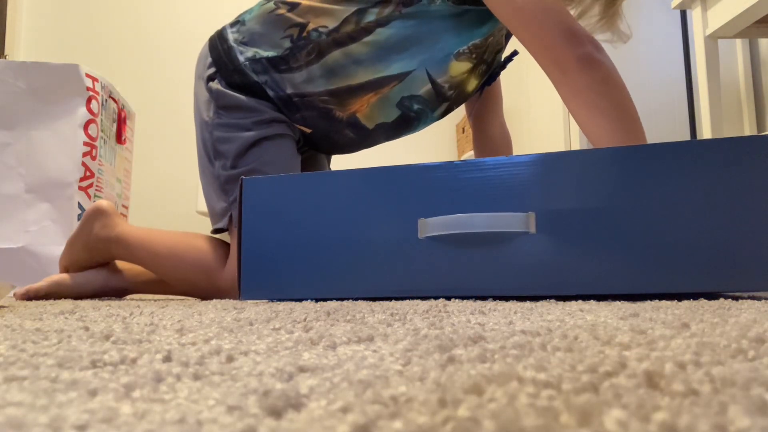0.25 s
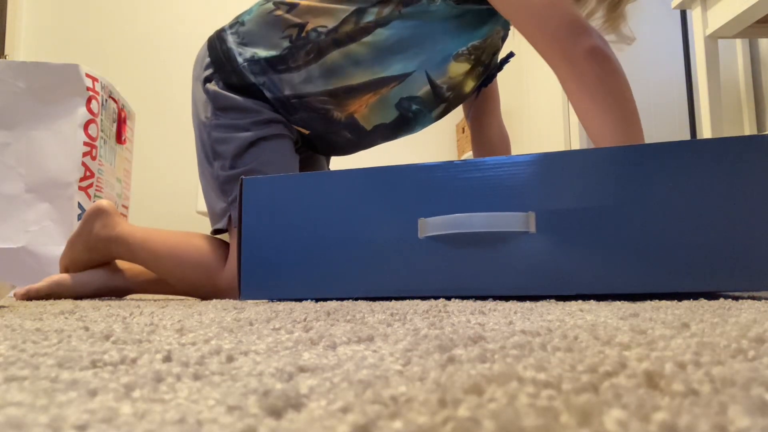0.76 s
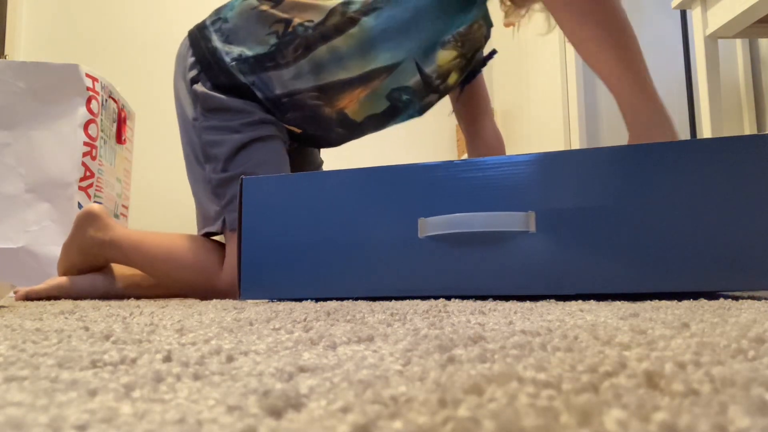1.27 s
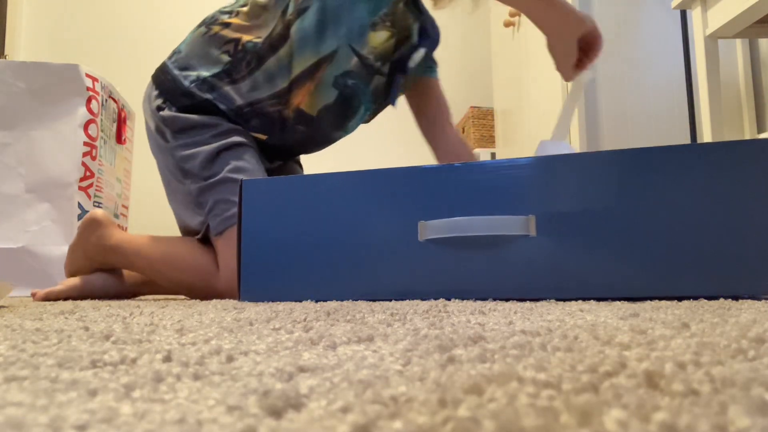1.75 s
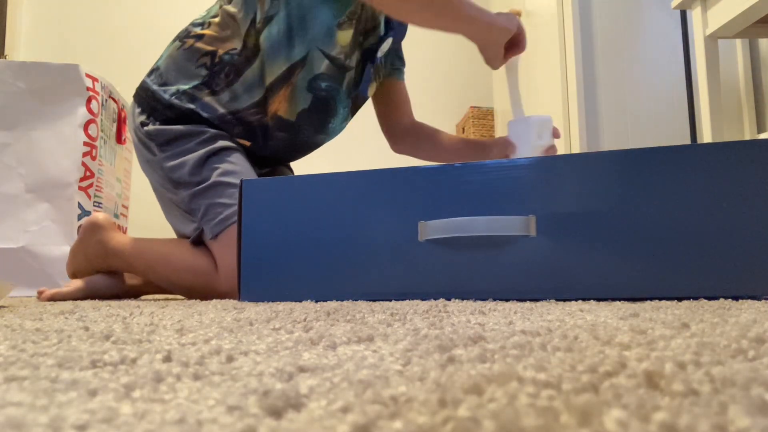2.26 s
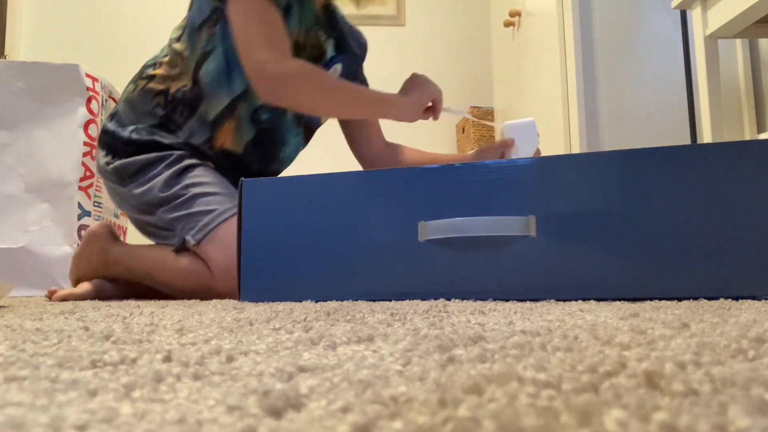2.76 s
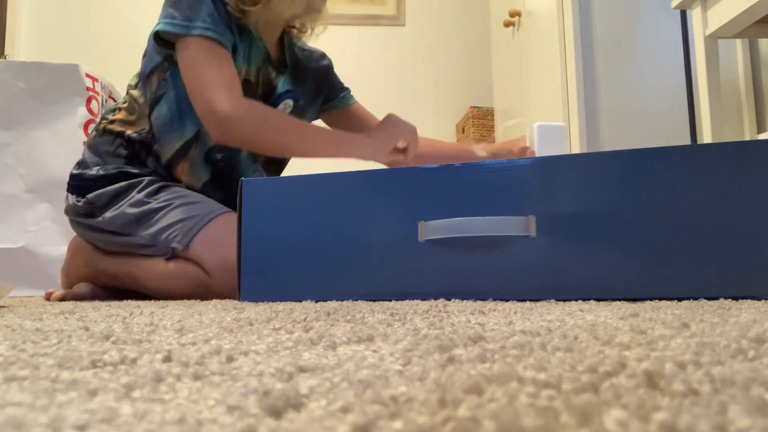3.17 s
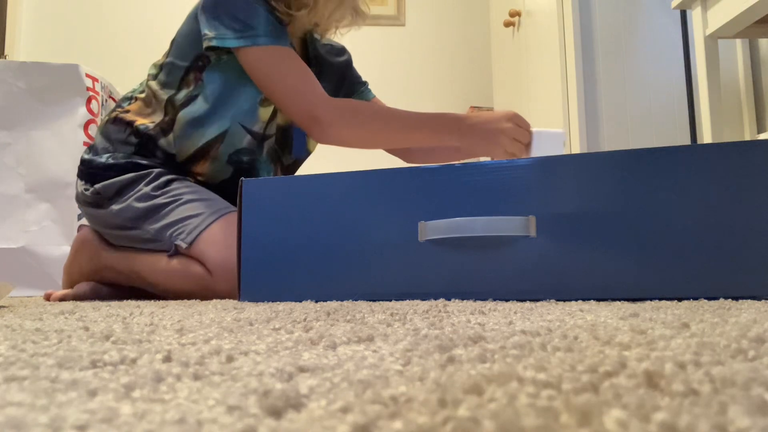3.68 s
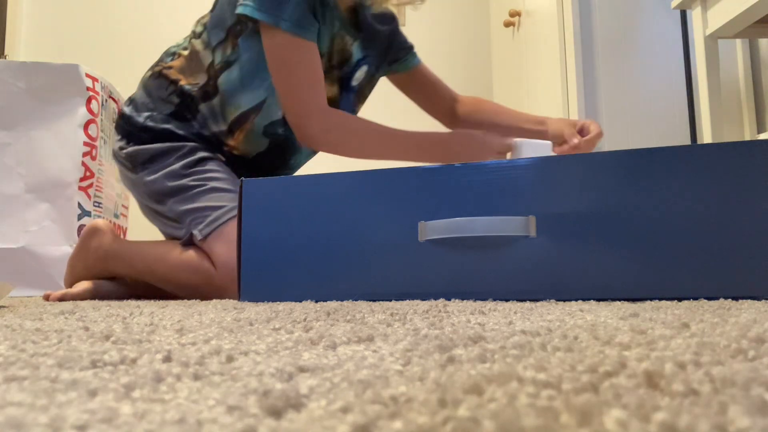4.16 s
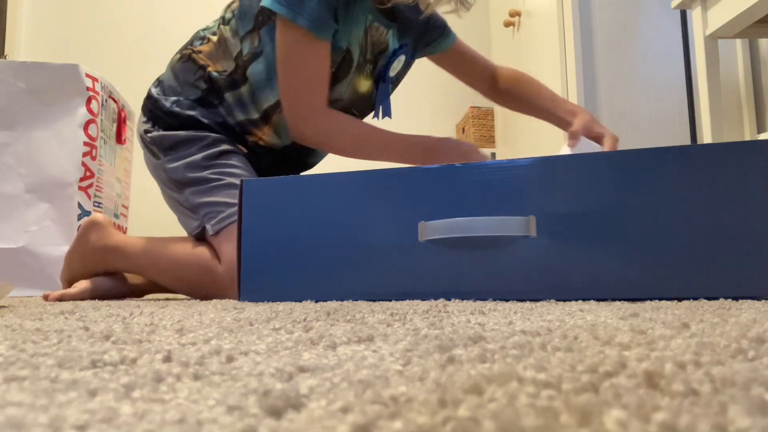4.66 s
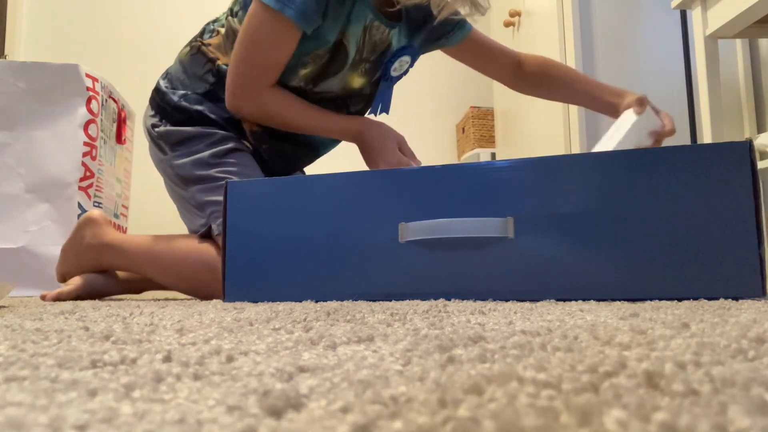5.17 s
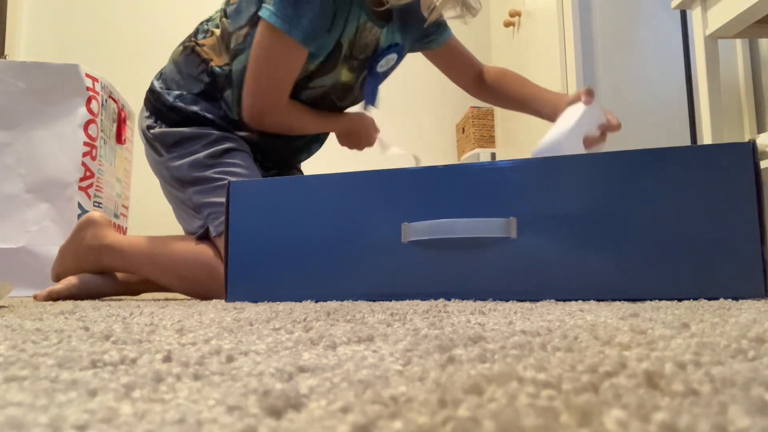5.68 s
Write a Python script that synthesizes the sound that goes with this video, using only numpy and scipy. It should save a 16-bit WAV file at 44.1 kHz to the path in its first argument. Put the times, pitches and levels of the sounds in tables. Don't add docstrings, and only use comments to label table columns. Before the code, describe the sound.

Sticky tape is ripped off a cardboard box in short scratchy pulls, with snaps, hollow board knocks and a loud final crack.

```python
import sys
import numpy as np
from scipy import signal
from scipy.fft import rfft, irfft, next_fast_len
from scipy.io import wavfile
from scipy.ndimage import uniform_filter1d

SR = 44100
rng = np.random.default_rng(int(sys.argv[2]) if len(sys.argv) > 2 else 0)


def rack_gain(trim_db):
    fader = np.asarray(trim_db, float)
    return 10 ** (fader / 20)


def wav_out(sig):
    wavfile.write(sys.argv[1], SR, np.round(np.clip(np.atleast_2d(sig).T, -1, 1) * 32767).astype(np.int16))


N = 261513
PADDED = next_fast_len(N)
BINS_HZ = np.fft.rfftfreq(PADDED, 1 / SR) + 1

# frequency in Hz, level in dB per Hz.
RIP_COLOUR = [(1200, 11.5), (1700, -2.5), (2300, 3.5), (3500, -1), (5000, -0.5), (6000, -5), (8500, 2),
              (11000, -0.5), (13500, -1), (15000, -0.5), (15800, 11.5), (16000, -61.5)]
# frequency in Hz, level in dB, 60 dB decay in s.
PANEL_MODES = [(112, -7.5, 0.089), (240, -18.5, 0.67), (258, 6, 0.069), (326.3, 0, 0.13),
               (373, -13.5, 0.41), (431, 1, 0.065), (498.6, 2, 0.076), (573, 4, 0.096),
               (693.8, -4.5, 0.086), (805.5, 3.5, 0.038), (947, 1, 0.041), (1040, -7.5, 0.075),
               (1163, -4.5, 0.073), (1244, 1.5, 0.025), (1524, -5, 0.036), (1721, -9, 0.08),
               (1880, 0.5, 0.0017)]
# start in s, peak in dB, centre of the ring in Hz, upper modes in dB.
THUMPS = [(.966, -29.5, 346, -4), (1.196, -34, 450, 25), (1.349, -47, 447, -25), (1.394, -40, 428, -49),
          (1.442, -33, 447, -4), (1.464, -49, 127, 1), (1.655, -29, 360, -1), (1.814, -37.5, 230, -19),
          (2, -31.5, 530, -11.5), (2.033, -26.5, 463, -4), (2.214, -35.5, 128.3, -29),
          (2.235, -39, 328, -6), (2.864, -38.5, 240, -41.5), (2.901, -41, 240, -30.5),
          (3.266, -45, 510, -6.5), (3.676, -36.5, 390, 1), (4.117, -21.5, 362, -9), (4.762, -23.5, 266, -7),
          (4.876, -32.5, 258, -38), (4.914, -23, 278, -16), (5.504, -18.5, 428, -18),
          (5.602, -34, 278, -26.5), (5.611, -30, 240, -23), (5.616, -30.5, 117, -35),
          (5.666, -42.5, 500, 9.5)]
# start in s, peak in dB, centre of the ring in Hz, upper modes in dB.
TAPS = [(0.225, -44.5, 627, 3), (0.236, -42, 607, 4), (0.635, -35.5, 595, 14), (1.24, -30.5, 840, -34),
        (1.328, -27.5, 940, -35), (1.712, -35.5, 583, -5), (1.749, -35.5, 810, -17), (2.361, -21, 633, -13),
        (2.477, -33.5, 613, 0), (2.5186, -16.5, 680, 7), (2.805, -41, 835, -9), (3.061, -30, 557, 8),
        (3.159, -30, 1210, -38), (3.361, -51.5, 583, -15), (3.438, -57, 547, -12), (3.778, -34, 600, -4),
        (3.991, -43, 1070, -24), (4.09, -30, 1130, 7), (4.399, -38.5, 800, -1), (4.457, -42, 735, -7),
        (4.921, -20.5, 800, 4), (4.977, -20.5, 940, 8), (5.233, -47, 543, -11), (5.251, -37.5, 604, -8),
        (5.335, -36.5, 684, -8), (5.413, -41.5, 556, -17), (5.451, -38.5, 510, -19.5), (5.492, -10, 566, 2),
        (5.524, -22, 550, -27), (5.69, -44, 526, -5)]


def rms_one(x):
    return x / np.sqrt(np.mean(x ** 2) + 1e-20)


def at_hz(points, column=1):
    table = np.array(points)
    return np.interp(np.log(BINS_HZ), np.log(table[:, 0]), table[:, column])


def coloured(x, points, low_hz=0, high_hz=30000):
    band_power = 1 / (1 + (low_hz / BINS_HZ) ** 8) / (1 + (BINS_HZ / high_hz) ** 8)
    spectrum = rfft(x, PADDED) * rack_gain(at_hz(points)) * np.sqrt(band_power)
    return irfft(spectrum, PADDED)[:, :N]


def above(x, hz):
    return signal.sosfilt(signal.butter(4, hz, "high", fs=SR, output="sos"), x)


def drift(per_s):
    r = np.exp(-40 * np.pi * per_s / SR)
    noise = rng.standard_normal(N // 20 + 2002)
    slow = signal.lfilter([1], [1, -2 * r, r * r], noise)[2000:]
    return np.interp(np.arange(N) / 20, np.arange(len(slow)), rms_one(slow))


def grains(per_s, spread_db):
    sizes = rack_gain(spread_db * np.minimum(rng.exponential(1, N), 5))
    slips = sizes * (rng.random(N) < per_s / SR)
    return slips * rng.choice([-1, 1], (2, N))


def motion(releases, late_s=0):
    pause_s, jump_s = .024, .013
    t = np.arange(N) / SR
    for s, *_ in releases:
        i = round((s + late_s) * SR)
        t[max(i - round(pause_s * SR), 0):i] = s - pause_s
        t[i:i + round(jump_s * SR)] = s + jump_s
    return t


def effort(t, strokes, fade_db_per_s, rest_db, rest_colour):
    power = rack_gain(2 * rest_db) + 0 * t
    colour = power * rest_colour
    for s, db, swell_s, own_colour, hold_s in strokes:
        span_s = s + np.array([-3 * swell_s - .05, hold_s + .4])
        near = slice(*np.clip(np.round(span_s * SR), 0, N).astype(int))
        below_full_db = 20 * np.maximum(s - t[near], 0) / swell_s
        faded_db = fade_db_per_s * np.maximum(t[near] - s - hold_s, 0)
        part = rack_gain(2 * (db - below_full_db - faded_db))
        power[near] += part
        colour[near] += part * own_colour
    return 10 * np.log10(power), colour / power


def stillness():
    # frequency in Hz, level in dB per Hz.
    still_colour = [(30, -21.5), (60, 7), (150, -1.5), (500, -7), (1300, -21), (2500, -21), (6000, -24.5),
                    (9000, -30), (15700, -31), (16000, -53.5)]
    return rack_gain(-74.5) * rms_one(coloured(rng.standard_normal((2, N)), still_colour))


def rumble():
    # frequency in Hz, width in Hz, level in dB.
    floor_modes = [(48.6, 7.5, 8), (62.2, 2.7, -7.5), (83.6, 11, -4), (118.7, 18, -1.5)]
    # full load in s, level in dB, loudest floor mode in Hz, hold in s.
    loads = [(0.806, -66.5, 70, .04), (0.934, -51.5, 105, 0.25), (1.117, -52, 99, 0.1),
             (1.452, -47, 75, 0.0037), (1.695, -55, 87, .005), (1.803, -55.5, 100, 0.084),
             (2.04, -48.5, 70, 0.0028), (2.236, -53, 101, 0.0036), (2.445, -52, 67.5, 0.037),
             (2.562, -57, 80, 0.12), (2.912, -55.5, 100, 0.079), (3.063, -55, 67, 0.086),
             (3.702, -51.5, 92, 0.037), (4.143, -51.5, 88, 0.067), (4.66, -52, 90.5, .02),
             (4.763, -53, 118, 0.13), (4.917, -41, 108, 0.045), (5.075, -52.5, 80, 0.11),
             (5.204, -53, 65.4, 0.017), (5.45, -66.5, 112, .005), (5.5, -61, 105, 0.03),
             (5.637, -35.5, 95.4, 0.0023)]
    kneeling_db, kneeling_hz, swell_s = -69, 84.2, 0.17
    strokes = [(s, db, swell_s, hz, hold_s) for s, db, hz, hold_s in loads]
    level_db, centre_hz = effort(motion([]), strokes, 180, kneeling_db, kneeling_hz)
    centre_hz = 82 * (centre_hz / 82) ** 0.94
    out = 0
    for hz, width_hz, mode_db in floor_modes:
        r, w = np.exp(-np.pi * width_hz / SR), 2 * np.pi * hz / SR
        noise = rng.standard_normal((2, N))
        ringing = signal.lfilter([1, 0, -1], [1, -2 * r * np.cos(w), r * r], noise)
        distance_db = 16.4 * np.log2(hz / centre_hz) ** 2
        out = out + rack_gain(mode_db - distance_db) * rms_one(ringing)
    band = signal.butter(2, [38, 170], "band", fs=SR, output="sos")
    return rack_gain(level_db - 5.0) * signal.sosfilt(band, out)


def film(threads, edges_hz, patchy_db, lines_db):
    hz, _, frames = signal.stft(threads, SR, nperseg=512)
    chance = rng.standard_normal((2, *frames.shape[1:]))
    broad = uniform_filter1d(uniform_filter1d(chance[0], size=18, axis=0), size=6, axis=1)
    narrow = uniform_filter1d(uniform_filter1d(chance[1], size=2, axis=0), size=8, axis=1)
    rip_hz, rip_db = np.transpose(RIP_COLOUR)
    colour_db = np.interp(np.log(hz + 1), np.log(rip_hz), rip_db)[:, None]
    flicker_db = patchy_db * rms_one(broad) + lines_db * np.clip(rms_one(narrow), -3, 1.8)
    frames = frames * rack_gain(colour_db + flicker_db)
    below = [1 / (1 + (hz[:, None] / edge) ** 14) for edge in edges_hz]
    parts = []
    for low, high in zip(below, below[1:]):
        band = frames * np.sqrt(high - low)
        parts.append(signal.istft(band, SR, nperseg=512)[1][:, :N])
    return parts


def peel():
    # start in s, peak in dB, dying time in s.
    snaps = [(.006, -59, 0.14), (1.2516, -34, .06), (1.3957, -38, .08), (2.5985, -25.5, 0.043),
             (2.9417, -34, .03), (2.9637, -36, .03), (0.2244, -49, 0.15), (0.286, -74, 0.06),
             (0.6406, -21, 0.047), (0.767, -55, 0.06), (0.9694, -27, 0.37), (1.3284, -29, 0.27),
             (1.443, -23.5, 0.079), (1.6614, -23, 0.022), (1.9322, -21, 0.039), (1.9415, -26, 0.12),
             (2.202, -44, 0.06), (2.2154, -53, 0.049), (2.3611, -29, 0.069), (2.477, -25, 0.11),
             (2.5198, -14, 0.22), (3.0586, -25, 0.24), (3.16, -26, 0.13), (3.501, -58, 0.072),
             (3.7799, -23.5, 0.18), (3.9905, -23, 0.36), (2.717, -37, .02), (2.863, -51, 0.03),
             (2.897, -50.5, 0.037), (4.032, -40.5, 0.089), (4.3847, -32.5, 0.31), (4.4023, -31, 0.089),
             (4.4575, -24.5, 0.056), (4.9192, -14, 0.078), (5.4134, -58, 0.055), (5.448, -35.5, 0.06),
             (5.492, -10, 0.2), (5.4994, -23, 0.045), (5.7255, -30.5, 0.032)]
    # time in s, creep in dB.
    tension = [(0, -87), (.18, -88), (.44, -87), (.55, -66), (.74, -70.5), (.86, -60.5), (1.07, -51.5),
               (1.35, -56.5), (1.57, -63.5), (1.75, -56), (1.9, -59), (2.12, -80), (3.5, -106), (4.35, -95),
               (5.06, -59), (5.36, -68), (5.65, -83.5), (5.93, -75.5)]
    # full force in s, rip in dB, swell in s, lower rasp against it in dB, hold in s.
    pulls = [(.29, -61, 0.034, -5.5, 0.036), (.78, -59.5, 0.036, -7, 0.014),
             (1.44, -50.5, 0.33, -15, 0.063), (1.68, -54, 0.076, -1, 0.056), (1.96, -45, 0.03, -1, 0.083),
             (2.63, -53, 0.39, -12, 0.36), (3.11, -52, 0.19, -5.5, 0.096), (3.26, -71.5, 0.044, 8, 0.017),
             (3.51, -71, .01, -10, 0.04), (3.6, -54, 0.028, -11, 0.065), (4.04, -42, 0.045, -8.5, 0.035),
             (4.49, -42, 0.058, -8.5, 0.044), (4.58, -47.5, .06, -15.5, 0.034),
             (4.67, -39, 0.17, -3.5, 0.029), (4.79, -39, 0.095, -8, 0.025), (4.92, -39.5, 0.1, -3.5, 0.07)]
    # full force in s, rip in dB, swell in s, lower rasp against it in dB.
    jerks = [(0.636, -50, 0.025, 2.5), (1.156, -38.5, 0.078, -8.5), (1.25, -44.5, 0.007, -6),
             (2.21, -45, 0.029, -6.5), (2.36, -41.5, 0.022, -4.5), (2.527, -46, 0.093, -2),
             (3.07, -45.5, 0.023, -28), (3.802, -52, 0.16, -2), (3.56, -66, 0.087, -15),
             (3.88, -63.5, 0.073, -2), (3.95, -55, 0.21, -12), (4.114, -35.5, 0.051, -2.5),
             (4.41, -49, 0.045, -13), (.012, -79.5, .01, 9), (5.45, -45, 0.051, -4.5),
             (5.499, -29, 0.022, 0), (5.73, -56, 0.013, -12), (5.93, -60.5, 0.15, -7)]
    # time in s, shrill top in dB, mid ring of the film in dB.
    strip = [(0, -7, -6), (.6, -2, -1.5), (1.1, -1, 1), (1.26, -4.5, 2), (1.42, -4.5, 11), (1.64, 2, 1),
             (2.0, -3.5, -9), (2.4, -2.5, 1), (2.8, -8, 1.5), (3.2, -9, -10), (3.7, 0.5, 3), (4.0, -6, -2),
             (4.116, 4, 0), (4.41, -7, 6.5), (4.7, 2.5, -5.5), (5.0, -1, -1), (5.5, -1, -2.5),
             (5.93, -1.5, 3.5)]
    film_ring_hz = [3970, 5600]

    t = motion(snaps)
    strokes = pulls + [(*jerk, 0) for jerk in jerks]
    creep_db, creep_rasp_db = np.interp(t, *np.transpose(tension)), -3
    rip_db, rasp_db = effort(t, strokes, 214, creep_db, creep_rasp_db)
    clumps = rack_gain(0.1 * drift(150) + 0.73 * drift(19))
    threads = grains(5000, spread_db=-1.8) * clumps
    edges_hz = [1500, *film_ring_hz, 6100, 11400, 20000]
    low, ring, rest, bright, top = film(threads, edges_hz, patchy_db=0.7, lines_db=3.8)
    strip_s, shrill_db, ring_db = np.transpose(strip)
    shrill = rack_gain(np.interp(t, strip_s, shrill_db)) * top
    film_ring = rack_gain(np.interp(t, strip_s, ring_db)) * ring
    rip = rack_gain(rip_db + 2.0) * (bright + shrill) / np.std(bright + top)
    rip += rack_gain(rip_db + rasp_db + 1.0) * (low + rest + film_ring) / np.std(low + ring + rest)

    burst = np.zeros(N)
    for s, peak_db, dying_s in snaps:
        i = round(s * SR)
        after = np.arange(min(N - i, SR // 4)) / SR
        burst[i:i + len(after)] += rack_gain(peak_db - 20.5 - 60 * after / min(dying_s, .3))
    spray = rms_one(coloured(rng.standard_normal((2, N)), RIP_COLOUR, low_hz=1440))
    return rip, burst * spray


def scrape():
    # time in s, drumming in dB.
    pressure = [(0, -61.5), (.2, -82), (.43, -72.5), (.64, -55), (1.4, -66), (1.62, -57), (1.91, -88),
                (2.45, -52), (2.58, -48), (2.79, -60.5), (3.2, -56), (3.53, -80.5), (3.9, -65.5),
                (4.35, -78), (5.08, -49.5), (5.32, -62), (5.8, -80.5), (5.93, -81.5)]
    # full force in s, drumming in dB, swell in s, upper modes against it in dB, hold in s.
    rubs = [(0.276, -58.5, 0.064, 2.5, 0.022), (0.734, -63, 0.061, -42, .005),
            (0.943, -47, 0.26, -4.5, 0.34), (1.345, -61, 0.02, 1, 0.03), (1.387, -53.5, .03, -3, 0.094),
            (1.656, -38, 0.019, -15, 0.0049), (1.715, -52.5, 0.082, -2, 0.067),
            (1.844, -60.5, 0.075, 1, 0.033), (1.971, -39, 0.059, -5, 0.091),
            (2.248, -45.5, 0.081, -11, 0.019), (2.376, -36, 0.015, -9, .002),
            (2.522, -38.5, 0.046, -2.5, 0.011), (2.92, -53, 0.081, -13, 0.082),
            (3.681, -44.5, 0.044, -8.5, 0.029), (4.094, -49, 0.093, 6, .005),
            (4.14, -46, 0.056, -13, 0.0012), (4.476, -46, 0.022, -2, 0.032), (4.681, -44, 0.16, 8, 0.0093),
            (4.763, -40, 0.24, -8.5, 0.047), (4.929, -34, 0.17, -12, 0.071), (5.467, -50.5, 0.12, 5, .005),
            (5.512, -21.5, 0.027, -8, 0.0086), (5.605, -43, .05, -6, .005),
            (5.664, -48.5, 0.074, -14, 0.034)]
    t = motion(sorted(THUMPS + TAPS), late_s=0.0074)
    resting_db, resting_upper_db = np.interp(t, *np.transpose(pressure)), -7.5
    drum_db, upper_db = effort(t, rubs, 313, resting_db, resting_upper_db)
    low, high = np.zeros((2, 2, N))
    lumps = rack_gain(.7 * drift(17))
    contacts = grains(1200, spread_db=2.5)
    for k, (hz, level_db, t60) in enumerate(PANEL_MODES[1:]):
        r, w = rack_gain(-60 / (0.54 * t60 * SR)), 2 * np.pi * hz / SR
        own = np.roll(contacts, k * 9973, axis=1)
        ringing = signal.lfilter([0, 1], [1, -2 * r * np.cos(w), r * r], lumps * own)
        ringing = rack_gain(level_db + 1.54 * drift(4.8)) * rms_one(ringing)
        if hz < 600:
            low = low + ringing
        else:
            high = high + ringing
    drumming = rack_gain(drum_db - 2.5) * rms_one(low)
    return drumming + rack_gain(drum_db + upper_db - 0.36) * rms_one(high)


def cracks():
    # start in s, peak in dB, ring in Hz.
    crack_list = [(.008, -42.5, 660), (.15, -58, 870), (.664, -34.5, 550), (.895, -35, 785),
                  (.968, -33.5, 756), (1.33, -45, 920), (1.657, -27.5, 1000), (1.713, -33.5, 700),
                  (1.942, -30, 800), (2.362, -24, 800), (2.52, -25.5, 800), (2.719, -43.5, 890),
                  (3.062, -41, 770), (3.269, -41.5, 800), (3.687, -30.5, 690), (3.16, -41, 1130),
                  (3.780, -31.5, 1135), (4.092, -38, 900), (5.25, -49, 890), (4.118, -21.5, 746),
                  (4.921, -26, 820), (4.979, -24, 890), (5.173, -44.5, 704), (5.196, -50, 800),
                  (5.2325, -40.5, 800), (5.337, -45, 960), (5.492, -24.5, 905), (5.504, -30.5, 1030),
                  (5.508, -17, 985), (5.666, -41, 1210), (5.69, -43.5, 940), (.832, -41, 850),
                  (1.199, -54, 826), (1.237, -38, 930), (1.249, -38, 800), (1.421, -41, 764),
                  (1.444, -37, 804), (1.751, -44, 820), (2.003, -31, 565), (2.032, -36, 595),
                  (2.047, -36, 700), (2.21, -44, 570), (2.236, -42, 890), (2.655, -41, 800),
                  (3.15, -35.5, 1094), (3.364, -55, 696), (3.44, -53, 645), (4.025, -40, 1110),
                  (4.224, -43, 1190), (4.49, -44, 940), (4.584, -43, 610), (4.749, -40, 520),
                  (4.96, -20, 940), (5.553, -28.5, 600), (5.726, -55, 1240), (4.922, -26, 620),
                  (2.921, -46, 600), (2.942, -46, 645), (2.804, -45, 825), (5.521, -22.5, 613)]
    t, out = np.arange(SR // 20) / SR, np.zeros((2, N + SR))
    envelope = rack_gain(-60 * t / 0.015) * (1 - np.exp(-t / 0.0009))
    turns = rng.uniform(-1.3, 1, (len(crack_list), 2, 1))
    for (s, peak_db, hz), turn in zip(crack_list, turns):
        w = 2 * np.pi * hz
        ring = np.sin(w * t + .6 * turn)
        ring = ring + 0.69 * np.sin(1.675 * w * t) + 0.75 * np.sin(2.0 * w * t)
        i = round(s * SR)
        out[:, i:i + len(t)] += rack_gain(peak_db) * envelope * ring
    return out[:, :N]


def knocks():
    thump_ring, tap_ring = 0.56, 0.43
    hz, level_db, t60 = np.transpose(PANEL_MODES)[:, :, None]
    t, out = np.arange(SR // 8) / SR, np.zeros((2, N + SR))
    blows = sorted([(*b, thump_ring) for b in THUMPS] + [(*b, tap_ring) for b in TAPS])
    chance = rng.standard_normal((len(blows), 2, 2, len(PANEL_MODES)))
    for (s, peak_db, centre_hz, hard_db, share), (uneven, turn) in zip(blows, chance):
        near = rack_gain(-12 * np.log2(hz / centre_hz) ** 2) + rack_gain(hard_db + 3.0) * (hz > 700)
        decay = rack_gain(level_db - 60 * t / (t60 * share))
        modes = near * decay * np.exp(2j * np.pi * hz * t)
        strengths = rack_gain(3.27 * uneven) * np.exp(1j * 0.81 * turn)
        blow = (strengths @ modes).imag
        blow *= 1 - np.exp(-t / .0012)
        i = round((s + 0.001123) * SR)
        out[:, i:i + len(t)] += rack_gain(peak_db - 2.5) * blow / np.abs(blow[0]).max()
    return above(out[:, :N], hz=75)


def flexes():
    # start in s, peak in dB, frequency in Hz, 60 dB decay in s.
    buckles = [(.345, -52, 272, 0.091), (0.373, -49.5, 250, 0.068), (0.968, -46, 327, 0.04),
               (1.203, -39.5, 445, 0.1), (1.243, -40, 863, 0.12), (1.338, -37, 429.5, 0.16),
               (1.387, -43.5, 1400, 0.061), (1.415, -56, 1490, .08), (1.459, -47, 110, .07),
               (1.478, -43, 576, 0.033), (1.659, -29, 287, 0.066), (3.689, -33.5, 300, 0.043),
               (3.708, -50, 288, 0.042), (3.805, -45, 1178, 0.072), (4.226, -54.5, 1290, 0.075),
               (4.874, -28, 261, .06), (4.911, -27, 280, 0.064), (4.79, -44, 257, 0.045),
               (4.805, -32.5, 270, 0.079), (4.125, -31, 199, 0.03), (2.001, -30, 520, .04),
               (2.239, -42, 273, 0.065), (5.519, -18, 417, 0.043), (1.816, -41, 257, 0.048),
               (.72, -45.5, 228, .05), (0.851, -48, 193, 0.11), (4.121, -27, 300, 0.042),
               (4.761, -42, 266, 0.061), (4.96, -37, 1025, 0.094), (2.076, -32.5, 395, 0.087),
               (5.454, -36.5, 494, .05), (5.603, -30, 253, 0.037), (5.612, -25, 115.6, 0.071)]
    t, out = np.arange(SR // 5) / SR, np.zeros((2, N + SR))
    swell = 1 - np.exp(-t / 0.0025)
    for s, peak_db, hz, t60 in buckles:
        w = 2 * np.pi * hz
        ring = np.sin(w * t + [[0], [1]])
        neighbour = rack_gain(-9) * np.sin(1.12 * w * t + [[1], [-1]])
        i = round(s * SR)
        out[:, i:i + len(t)] += rack_gain(peak_db + 1.0 - 60 * t / t60) * swell * (ring + neighbour)
    return out[:, :N]


def room(x):
    t60_s, tail_db, dull_hz = 0.23, -10.5, 5400
    t = np.arange(SR // 2) / SR
    tail = rng.standard_normal((2, len(t))) * rack_gain(-60 * t / t60_s) * (t > .004)
    tail = signal.lfilter([1], [1, -np.exp(-2 * np.pi * dull_hz / SR)], tail)
    tail = rack_gain(tail_db) * tail / np.sqrt(np.sum(tail ** 2, axis=1, keepdims=True))
    return x + signal.fftconvolve(x, tail, axes=1)[:, :N]


def scene():
    still, floor = stillness(), rumble()
    rip, snaps = peel()
    board = above(scrape(), hz=218)
    sharp = knocks() + snaps + cracks()
    return rip + board + room(sharp) + flexes() + floor + still


def top_cut(x):
    return signal.sosfilt(signal.butter(12, 16480, fs=SR, output="sos"), x)


def record(dry):
    # frequency in Hz, likeness from 0 to 1, left minus right in dB.
    port_pair = [(40, 0.91, 0), (80, 1, 1), (150, 0.8, 2.5), (300, 0.96, 0.5), (800, 0.6, -3),
                 (2000, 0.33, -1.5), (4120, 0, -1.5), (5900, 0.08, -0.5), (6500, 0.34, 0.5),
                 (8650, 0.88, 1), (16000, 0.83, 1)]
    # frequency in Hz, lead in radians.
    left_lead = [(0, -.1), (130, -.25), (400, -.75), (1300, -1.0), (2200, -2.6), (3200, -3.1), (6400, -3.2),
                 (8300, -.3), (9500, .2), (10800, 2.95), (12000, 3.3), (13250, 6.1), (14700, 6.45),
                 (15600, 9.0), (16500, 9.42)]
    # time in s, left minus right in dB.
    sideways = [(0, -2), (.8, -1.6), (1.6, -1.5), (2.2, -0.5), (2.7, -1), (3.5, -1), (4.4, -1.5),
                (4.8, -.5), (5.2, -1), (5.6, -1.5), (5.93, 0)]
    first, second = rfft(dry, PADDED)
    alike = at_hz(port_pair)
    shared, own = np.sqrt((1 + alike) / 2) * first, np.sqrt((1 - alike) / 2) * second
    lead = np.interp(BINS_HZ, *np.transpose(left_lead))
    half = rack_gain(at_hz(port_pair, column=2) / 2) * np.exp(.5j * lead)
    ports = irfft(np.array([(shared + own) * half, (shared - own) / half]), PADDED)[:, :N]
    balance_db = np.interp(np.arange(N) / SR, *np.transpose(sideways))
    ports = ports * rack_gain(balance_db * [[.5], [-.5]])
    treble_limit = signal.cheby2(10, 60, 16250, fs=SR, output="sos")
    return top_cut(signal.sosfilt(treble_limit, ports))


dry = scene()
out = record(dry)
wav_out(out)
```